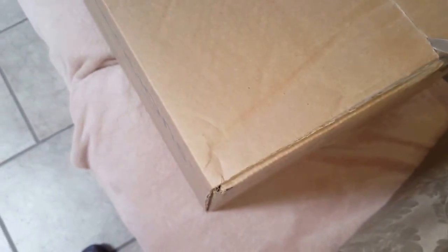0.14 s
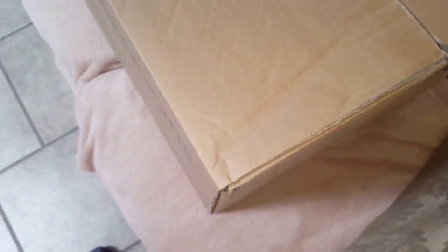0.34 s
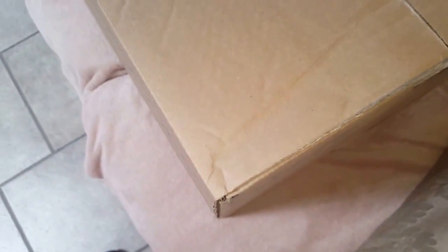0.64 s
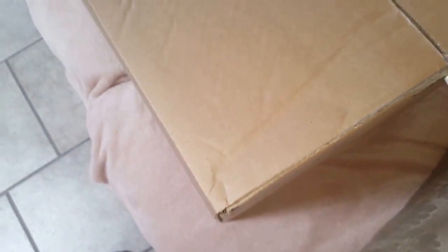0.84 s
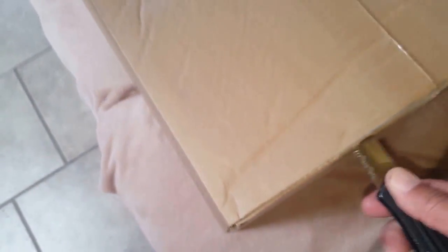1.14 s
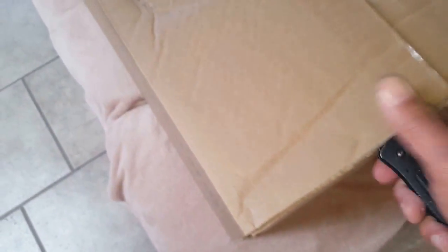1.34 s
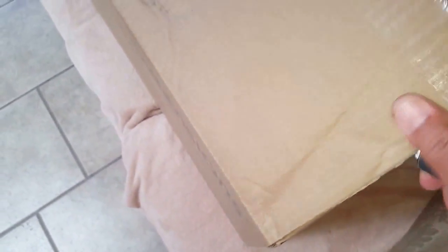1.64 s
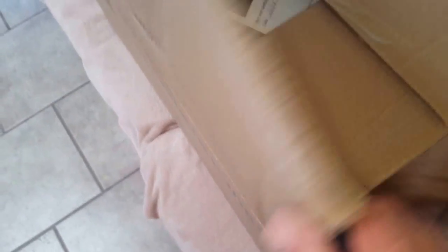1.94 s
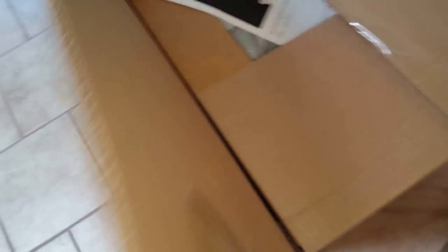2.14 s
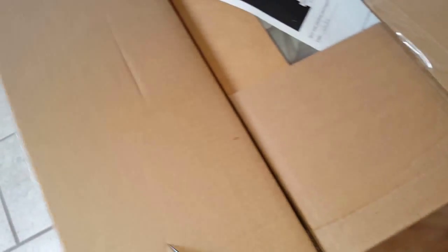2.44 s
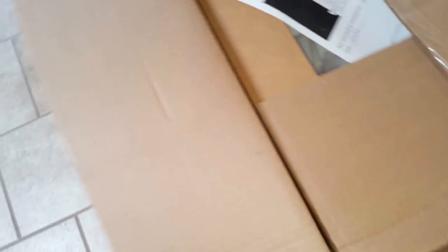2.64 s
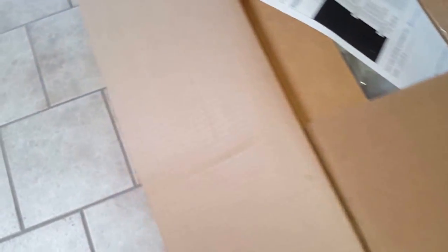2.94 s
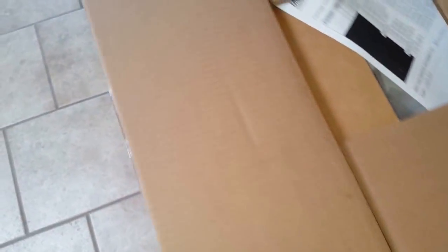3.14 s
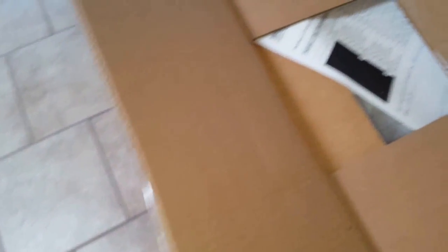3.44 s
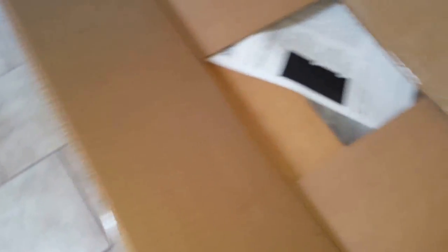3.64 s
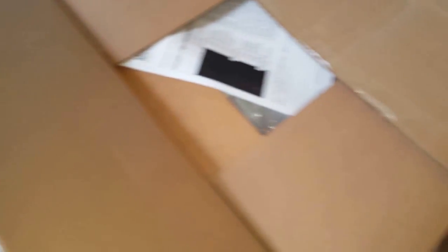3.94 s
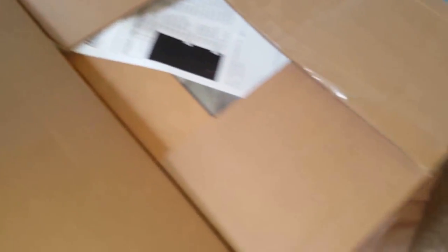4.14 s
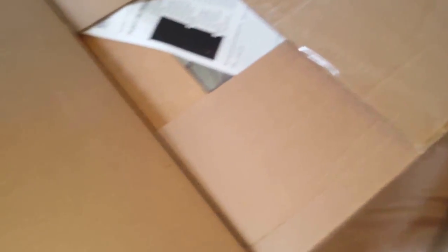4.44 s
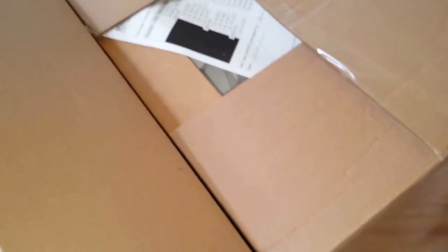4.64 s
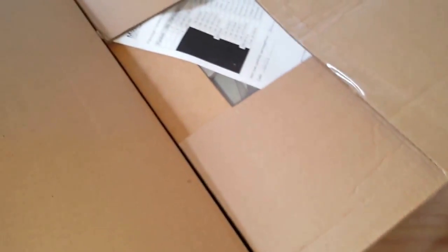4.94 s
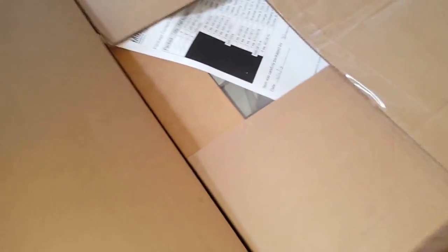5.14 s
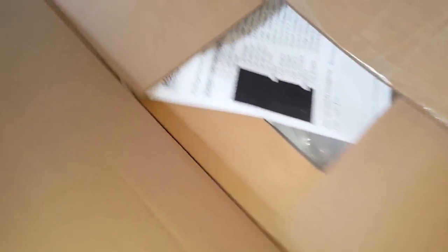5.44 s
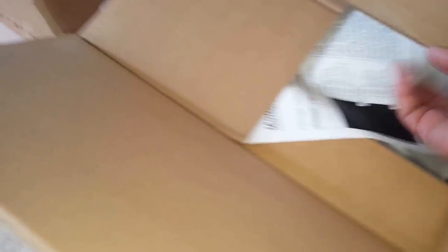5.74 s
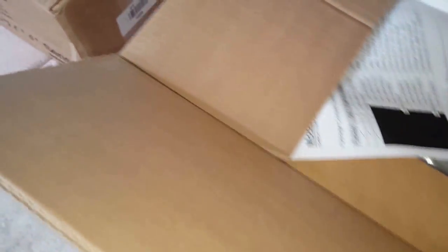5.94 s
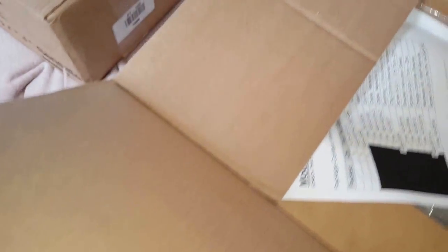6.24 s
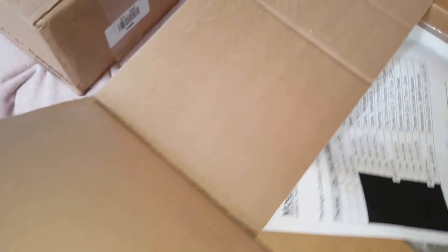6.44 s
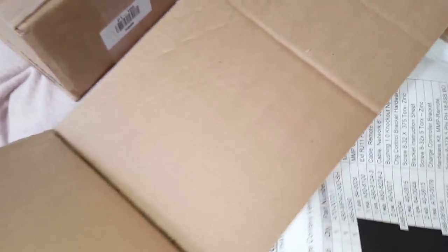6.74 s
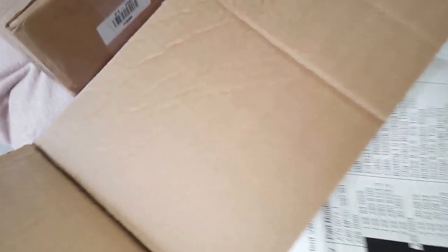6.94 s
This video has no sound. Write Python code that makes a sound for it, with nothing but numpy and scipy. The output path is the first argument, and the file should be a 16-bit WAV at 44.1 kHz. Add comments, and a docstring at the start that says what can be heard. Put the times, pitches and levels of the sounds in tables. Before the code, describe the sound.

Gritty cardboard friction comes in irregular gusts, with crisp fibre ticks and low boxy knocks. The strongest burst is a snapping release early on; afterwards the flaps fold with lighter scuffs and taps. After a quiet gap a blade touches down with a brief ring, then rubbing swells again to the end. Close stereo phone pickup, faint room air and hum, short live indoor echo.

```python
"""Rubbing board hisses and scrapes in gusts of tiny slips as a hand with a knife opens a cardboard box.
The flaps are slit, lifted and folded back close to a phone in a tiled room; the slips shake the hollow box.
Fibres and tape tick as noise bursts; flaps and hand knock the box's decaying modes.
The knife is laid down with a short metal ring. Faint hum, shaped-noise air and a noise-tail echo lie under it."""
import sys
import numpy as np
from scipy import signal
from scipy.fft import rfft, irfft, next_fast_len
from scipy.io import wavfile
from scipy.ndimage import uniform_filter1d, map_coordinates

SR = 44100
rng = np.random.default_rng(int(sys.argv[2]) if len(sys.argv) > 2 else 0)


def generate_wav(signal):
    """Clip the signal to [-1, 1] and save it as 16-bit WAV at the path in sys.argv[1]."""
    frames = np.transpose(np.atleast_2d(signal))
    scaled = np.clip(frames, -1, 1) * 32767
    pcm = np.round(scaled).astype(np.int16)
    wavfile.write(sys.argv[1], SR, pcm)


N = 313110  # samples

# modes of the hollow box: mode_hz, level_db, t60_s
BOX_MODES = [(134.7, 2.5, 0.15), (178, -1.5, 0.095), (230.9, 2, 0.045), (296.3, -7, 0.074),
             (379, -7, 0.046), (441, -13, 0.13), (519.5, -4, 0.071), (625, -6, 0.067), (796, -9.5, 0.046),
             (1080, -5, 0.029)]
# modes of the whole box heaving: mode_hz, level_db, t60_s
HEAVE_MODES = [(70, 0, 0.15), (98.8, -3.5, 0.19)]
# where the hand works: time_s, left_port_delay_ms, left_minus_right_db, hiss_gain_above_10_khz_db
HAND_PATH = [(.25, 0.24, 3.5, -2), (.75, -0.034, 0, 2), (1.25, 0.117, 5, 3), (1.75, 0.0086, 4, 2.5),
             (2.25, -0.153, 7.5, 9.5), (2.75, -0.21, 5.5, 14.5), (3.5, -0.044, 6.5, 4.5),
             (4.75, 0.38, -0.5, -15), (5.25, 0.24, 7, 1), (5.9, 0.07, 5, -1), (6.15, 0.19, 2.5, 9.5),
             (6.9, 0.16, 1.5, 4.5)]
BASS_PAN_DB = -2.5  # left minus right
MID_SIDE = np.array([[1], [-1]])  # sign of the side signal on left, right


def undb(db):
    """Decibels to amplitude."""
    return 10 ** (np.asarray(db) / 20)


def unit(x):
    """Scale x to rms 1."""
    return x / np.sqrt(np.mean(x ** 2))


def colour(x, spectrum):
    """Shape x by a (Hz, dB) spectrum; rms 1."""
    hz, db = np.transpose(spectrum)
    size = next_fast_len(N)
    bin_hz = np.maximum(np.arange(size // 2 + 1) * SR / size, 1)
    gain = undb(np.interp(np.log(bin_hz), np.log(hz), db))
    return unit(irfft(rfft(x, size) * gain, size)[..., :N])


def ring(x, modes):
    """Decaying two-pole modes (Hz, dB, t60 s) struck by x."""
    out = 0
    for hz, db, t60_s in modes:
        radius = np.exp(-np.log(1000) / (t60_s * SR))
        angle = 2 * np.pi * hz / SR
        poles = [1, -2 * radius * np.cos(angle), radius ** 2]
        out = out + undb(db) * signal.lfilter([0, np.sin(angle)], poles, x)
    return out


def split(x, hz):
    """The parts of x under and over hz; they add up flat."""
    low, high = (signal.butter(3, hz, kind, fs=SR, output="sos") for kind in ("low", "high"))
    return signal.sosfilt(low, x), signal.sosfilt(high, x)


def slips(rate_hz, spread_db):
    """Random stick-slip clicks of unequal size."""
    size_db = spread_db * np.minimum(rng.exponential(size=N), 4)
    happens = rng.random(N) < rate_hz / SR
    return happens * rng.standard_normal(N) * undb(size_db)


def flicker(rate_hz, step_db):
    """Wandering gain: random dB steps, smoothed over one step."""
    hold = int(SR / rate_hz)
    steps = np.repeat(rng.standard_normal(N // hold + 1), hold)
    return undb(step_db * uniform_filter1d(steps, hold)[:N])


def sides(pan_db):
    """Left and right gains for a left-minus-right level."""
    return undb(np.array([pan_db, -pan_db]) / 2)


def panel_db(hz, pitch_hz):
    """A panel feeds the box modes near its own pitch most."""
    octaves = np.log2(hz / pitch_hz)
    # modes above the pitch fall off more gently
    return -29 * np.where(octaves > 0, .6, 1) * octaves ** 2


def strokes(step=64):
    """Levels of hiss, scrape and rumble and the shaken panel's pitch, summed over all strokes."""
    # strokes of board on board: full_strength_s, swell_s, hold_s,
    # surface_hiss_db, flute_scrape_db, box_rumble_db, panel_pitch_hz
    stroke_table = [(0.0, 0.044, .12, -41.5, -42, -41, 216), (0.34, 0.1, 0.016, -40.5, -43.5, -37.5, 190),
                    (0.513, 0.14, 0.004, -57, -54.5, -50.5, 262), (.61, 0.054, 0.004, -40, -42.5, -37, 237),
                    (.702, .12, .005, -59, -55, -57, 200), (0.747, .04, .005, -57, -49.5, -48, 175),
                    (0.885, 0.052, .01, -58, -56, -52.5, 230), (1.03, 0.038, 0.0029, -31.5, -36, -27, 216),
                    (1.086, 0.071, 0.0043, -31.5, -35.5, -25, 228),
                    (1.157, 0.14, 0.013, -33.5, -41, -30, 206), (1.314, 0.12, 0.0063, -50, -47.5, -45, 252),
                    (1.469, .2, 0.0061, -47, -48.5, -40.5, 217), (1.545, 0.032, .005, -59, -49, -38, 240),
                    (1.582, 0.022, 0.0043, -64, -46, -40, 255),
                    (1.687, 0.0098, 0.0042, -37.5, -16, -21, 294),
                    (1.723, 0.07, 0.059, -47.5, -57, -28, 181), (1.82, .15, 0.036, -55, -57.5, -44.5, 221),
                    (1.943, 0.11, .01, -59.5, -50.5, -42, 228.6),
                    (2.029, 0.29, 0.096, -53, -56, -56.5, 209), (2.326, 0.29, 0.023, -65, -68, -56, 197),
                    (2.411, 0.067, 0.096, -72.5, -67, -53.5, 274),
                    (2.715, 0.014, 0.0038, -56, -38, -43, 420),
                    (2.751, 0.044, 0.0033, -51, -33.5, -34, 403),
                    (2.835, 0.14, 0.0057, -57.5, -42, -39.5, 417),
                    (2.973, 0.19, .005, -67.5, -56.5, -52, 410),
                    (3.16, 0.078, 0.15, -68.5, -65.5, -56.5, 347),
                    (3.34, 0.038, 0.074, -65.5, -55, -46.5, 383),
                    (3.505, 0.0034, 0.0024, -74, -31.5, -41, 330),
                    (3.522, 0.011, 0.021, -49, -39, -38, 328.4), (3.576, .02, 0.054, -95, -78, -56, 320),
                    (3.984, 0.33, 0.076, -69, -66, -78, 249), (4.748, 0.016, 0.014, -51.5, -48, -38.5, 181),
                    (4.775, .03, 0.066, -66, -51.5, -47.5, 212), (5.008, 0.073, 0.089, -77, -71, -54, 197),
                    (5.172, 0.091, .005, -82, -58.5, -60, 198), (5.53, 0.54, 0.028, -70, -67, -79, 231),
                    (5.796, 0.0072, 0.027, -47, -31, -33.5, 365),
                    (5.849, 0.079, 0.03, -41, -37, -36.5, 220), (5.927, 0.054, 0.018, -56, -44, -36, 151),
                    (6.019, 0.25, 0.033, -69, -54.5, -49.5, 244),
                    (6.146, 0.51, 0.055, -50, -54.5, -56.5, 150),
                    (6.202, 0.0066, 0.017, -60, -47, -26, 157), (6.311, 0.29, 0.034, -51, -53, -42, 195),
                    (6.461, 0.21, .03, -52, -47.5, -57, 296), (6.543, .12, .005, -41, -39.5, -35.5, 290),
                    (6.624, 0.14, .005, -49, -53, -48, 236), (6.738, 0.16, 0.024, -50, -54.5, -47.5, 200),
                    (6.885, 0.11, 0.035, -39, -42, -36.5, 218),
                    (6.93, 0.1, 0.046, -29.5, -36.5, -28.5, 166.8),
                    (7.1, 0.16, .005, -44.5, -36.5, -26.5, 180)]
    swell_db = 30  # gained over the swell time
    # rows below: hiss, scrape, rumble
    # fast stop of a stroke: fall_db_per_s
    stop_db_per_s = [499, 597, 357]
    # flap settling slowly: start_level_db (re stroke)
    settle_db = [-47, -32, -17]
    # flap settling slowly: fall_db_per_s
    settle_db_per_s = [99, 95, 87]
    # a resting hand still stirs the board: level_db
    rest_db = [-82, -87.5, -75.5]

    t = np.arange(0, N + step, step) / SR
    power = undb(rest_db)[:, None] ** 2 * np.ones_like(t)
    weighted_pitch = power[2] * np.mean(np.array(stroke_table)[:, -1])
    for start_s, swell_s, hold_s, *peak_db, pitch_hz in stroke_table:
        after_s = np.maximum(t - start_s - hold_s, 0)
        rise = undb(-swell_db * np.maximum(start_s - t, 0) / swell_s)
        stop = undb(-np.outer(stop_db_per_s, after_s))
        settle = undb(np.array(settle_db)[:, None] - np.outer(settle_db_per_s, after_s))
        stroke = (undb(peak_db)[:, None] * rise) ** 2 * (stop ** 2 + settle ** 2)
        power = power + stroke
        weighted_pitch = weighted_pitch + stroke[2] * pitch_hz
    # the panel shaken hardest sets the pitch
    curves = (*(10 * np.log10(power)), weighted_pitch / power[2])
    return [np.interp(np.arange(N) / SR, t, curve) for curve in curves]


def rubbing():
    """Slips hiss off the liner, scrape over the flutes and shake the hollow box."""
    # hiss spectrum of the liner: freq_hz, density_db_per_hz
    liner = [(1470, -7), (2500, 1), (4050, -7.5), (6250, -4), (8370, -4.5), (8980, -7), (10900, -7),
             (12400, -9), (15000, -13.5), (15900, -31), (16500, -36)]
    # scrape spectrum of the flutes: freq_hz, density_db_per_hz
    flutes = [(240, -27.5), (400, -3.5), (721, 4.5), (1060, -0.5), (1650, 3.5), (1910, -2), (2840, -11.5),
              (3220, -12), (4680, -17), (6000, -32), (7800, -50), (13200, -120)]
    hiss_grain_db, scrape_grain_db, pressure_db = 2.5, 4., 3.5
    heave_db, heave_octave_db = -10, 10  # heave in the rumble at 200 Hz; loss per octave of panel pitch

    t = np.arange(N) / SR
    hiss_db, scrape_db, rumble_db, pitch_hz = strokes()
    hand_s, _, pan_db, top_db = np.transpose(HAND_PATH)
    # the rubbed patch is wide, so part of its sound differs between the ports
    wide = .35 * MID_SIDE
    hiss_slips = slips(7100, hiss_grain_db) + wide * slips(11000, hiss_grain_db)
    grit, sheen = split(colour(hiss_slips, liner), 10000)
    hiss = grit + undb(np.interp(t, hand_s, top_db)) * sheen

    scrape_slips = slips(2500, scrape_grain_db) + wide * slips(2500, scrape_grain_db)
    body, edge = split(colour(scrape_slips, flutes), 1840)
    # a push that bends the board more than it slides sounds duller
    edge_db = np.clip(0.5 * (hiss_db - scrape_db) + 7.0, -12, 3)
    scrape = body + undb(edge_db) * edge

    shake = slips(1100, scrape_grain_db)
    # each mode radiates little below its own pitch
    modes = np.array([unit(split(ring(shake, [mode]), 0.71 * mode[0])[1]) for mode in BOX_MODES])
    weight = np.array([undb(db + panel_db(hz, pitch_hz)) for hz, db, _ in BOX_MODES])
    rumble = np.sum(weight * modes, axis=0) / np.sqrt(np.sum(weight ** 2, axis=0))
    # small high panels move the whole box less
    heave_gain = undb(heave_db - heave_octave_db * np.log2(pitch_hz / 200))
    rumble = rumble + heave_gain * unit(ring(shake, HEAVE_MODES))

    # contact pressure wanders
    face = undb(hiss_db) * hiss * flicker(90, pressure_db)
    face = face + undb(scrape_db) * scrape * flicker(70, pressure_db)
    panned_face = sides(np.interp(t, hand_s, pan_db)) * face
    return panned_face + sides(BASS_PAN_DB)[:, None] * undb(rumble_db) * rumble


def air():
    """Shaped-noise room air, alike on both ports in the bass, and a hum of wavering sines."""
    # room air spectrum: freq_hz, density_db_per_hz
    air_spectrum = [(15, -39), (25, -5), (48, -1), (128, -9.5), (154, -12.5), (422, -19.5), (524, -17.5),
                    (568, -19.5), (746, -23), (979, -24), (3230, -31.5), (9080, -44.5), (12200, -38),
                    (16500, -42.5)]
    # hum tones: tone_hz, rms_db
    hum_tones = [(123.8, -81.5), (468.3, -79.5)]
    air_db = -60.5
    mid, side = (colour(rng.standard_normal(N), air_spectrum) * flicker(3.0, 1.0) for _ in range(2))
    side = signal.sosfilt(signal.butter(1, 900, "high", fs=SR, output="sos"), side)
    t = np.arange(N) / SR
    hum = 0
    for hz, db in hum_tones:
        hum = hum + np.sqrt(2) * undb(db) * flicker(2.4, 1.0) * np.sin(2 * np.pi * hz * t)
    return undb(air_db) * (mid + 1.13 * side * MID_SIDE) + hum


def room(x):
    """Tail of fading noise, shortest in the treble; the bass reaches both ports nearly alike."""
    # reverberation by band: centre_hz, t60_s
    decay_bands = [(150, 0.44), (600, 0.64), (2500, 0.6), (9000, 0.36)]
    t, tail = np.arange(SR) / SR, 0
    for hz, t60_s in decay_bands:
        band = signal.butter(1, [hz / 2, hz * 2], "band", fs=SR, output="sos")
        noise = signal.sosfilt(band, rng.standard_normal((2, SR)))
        mid, side = noise * undb(-60 * t / t60_s) * np.minimum(t / 0.0099, 1)  # 9.9 ms build-up
        pair = mid + min(hz / 2500, 1) * side * MID_SIDE
        tail = tail + pair / np.sqrt(np.sum(mid ** 2) / hz)
    tail = tail / np.sqrt(np.sum(tail ** 2) / 2)
    return signal.fftconvolve(x[None], tail, axes=1)[:, :N]


def ticks(crack_ms=1.82, snap_ms=3.66, rise_ms=0.66):
    """Each release is a bright crack, coloured by the bit that let go, with a duller snap of the board."""
    # fibres and tape letting go, and the knife clicking down at 4.741, 4.749 and 4.998 s: start_s,
    # crack_peak_db, snap_peak_db, left_minus_right_db, crack_ring_hz
    releases = [(0.336, -27.5, -21.5, 2, 6750), (0.428, -38, -53, -6, 2730), (0.465, -41.5, -64, -8, 6300),
                (0.5357, -44, -58, 13, 3100), (0.579, -37, -61, 16, 6440), (0.599, -21.5, -25, 9, 3000),
                (0.616, -16, -26, 4, 2540), (0.6904, -46, -31.5, 3, 2550), (0.7038, -36, -40, 12, 2620),
                (0.7401, -21.5, -42, 4, 2470), (0.805, -41, -37.5, -3, 2900),
                (0.997, -29.5, -44, 14, 11200), (1.3019, -30, -31, 8, 6700),
                (1.3139, -32.5, -43, -17, 3100), (1.3197, -29, -50, 8.5, 3240),
                (1.4409, -40, -31.5, 7, 2760), (1.5303, -28.5, -41.5, 4, 6900),
                (1.5493, -38.5, -40, 17, 7890), (1.567, -39, -63, -19, 6590), (1.59, -25.5, -34, 7.5, 7800),
                (1.683, -11, -14.5, -7, 2500), (1.7047, -16, -37, 4, 7100), (1.7186, -19.5, -23, 7, 7300),
                (1.92, -34.5, -64, 11, 11200), (1.992, -31, -44, 6, 5800), (2.0248, -32, -36.5, 9, 2850),
                (2.0465, -14, -30, 11, 3300), (2.294, -49, -65, 9, 10260), (2.393, -53, -59, 21, 11000),
                (2.75, -35, -28, 13, 2400), (3.201, -44, -55, 6, 13000), (3.211, -39, -49, 10, 12600),
                (3.3273, -47, -54, 20, 12400), (3.3498, -50, -46, 17, 3250), (3.4138, -47, -37.5, 5, 2490),
                (3.5037, -37, -28, 11.5, 2830), (4.741, -54, -26.5, 10.5, 2625),
                (4.749, -39, -30, -14.5, 2470), (4.998, -50, -36, 6.5, 2450), (5.12, -58, -67, 0, 7000),
                (5.1624, -64, -52.5, 12, 2700), (5.7888, -50, -22.5, -2, 2440),
                (5.8125, -47, -22, -5, 2640), (5.8603, -40, -21, -3, 2800), (5.9387, -39.5, -48, 19, 8170),
                (6.0102, -36, -36, 6, 2550), (6.045, -55, -32, -1, 2440), (6.202, -33, -24.5, 0, 12460),
                (6.2112, -39, -53, -14, 7360), (6.403, -64, -41, 18, 2400), (6.5202, -30, -25, 6, 12600),
                (6.6593, -38, -49, -1.5, 11800), (6.7064, -32, -47, -2, 7200), (6.876, -29, -32, -6, 6410)]
    size = 2000
    out, ms = np.zeros((2, N + size)), np.arange(size) / SR * 1000
    bright = signal.butter(2, [3300, 14000], "band", fs=SR, output="sos")
    dull = signal.butter(2, [450, 2300], "band", fs=SR, output="sos")
    for start_s, crack_db, snap_db, pan_db, ring_hz in releases:
        noise = rng.standard_normal((2, size)) * np.minimum(ms / rise_ms, 1)
        burst = noise[0] * np.exp(-ms / crack_ms)
        crack = signal.sosfilt(bright, burst)
        crack = crack + 2.6 * signal.lfilter(*signal.iirpeak(ring_hz, 2.5, fs=SR), burst)
        snap = signal.sosfilt(dull, noise[1] * np.exp(-ms / snap_ms))
        tick = undb(crack_db) * crack / abs(crack).max() + undb(snap_db) * snap / abs(snap).max()
        start = int(start_s * SR)
        out[:, start:start + size] += sides(pan_db)[:, None] * tick
    return out[:, :N]


def knocks(contact_ms=0.66):
    """Half-sine pushes ring the struck panel and heave the whole box."""
    # flaps and hand hitting the box: start_s, blow_peak_db, panel_pitch_hz, heave_peak_db
    blows = [(0.337, -21.5, 190, -39), (0.601, -40, 660, -53), (0.617, -36.5, 230, -59),
             (0.742, -42.5, 122, -65), (1.028, -36, 182, -32), (1.045, -22, 224, -29),
             (1.098, -25, 253, -55), (1.470, -21, 222, -30.5), (1.548, -31, 237, -55),
             (1.685, -14, 283, -39), (1.696, -12, 273, -35), (1.722, -11.5, 226, -20),
             (1.745, -19, 134, -42), (2.715, -34.5, 338, -46), (2.752, -24, 345, -44),
             (3.415, -37.5, 300, -48), (3.503, -18, 345, -40), (3.524, -27.5, 306, -63),
             (4.759, -27, 196, -68), (5.006, -36.5, 182, -60), (5.846, -23.5, 150, -58),
             (5.925, -29.5, 116, -46), (6.203, -17.5, 199, -19.5), (6.404, -34.5, 290, -50),
             (6.472, -34, 272, -68), (6.522, -20, 345, -47), (6.542, -26, 218, -38.5),
             (6.911, -24.5, 242, -56), (7.07, -22, 130, -39), (7.087, -27, 152.3, -27)]
    out, push = np.zeros(N + SR), np.zeros(SR // 2)
    size = int(contact_ms * SR / 1000)
    push[:size] = np.sin(np.pi * np.arange(size) / size)
    low = signal.butter(2, 140, fs=SR, output="sos")
    heave = signal.sosfilt(low, ring(push, HEAVE_MODES))
    heave = heave / abs(heave).max()
    for start_s, blow_db, pitch_hz, heave_db in blows:
        # each blow lands elsewhere and so weights the modes anew
        share_db = 3.7 * rng.standard_normal(len(BOX_MODES))
        modes = [(hz, db + panel_db(hz, pitch_hz) + share, t60_s)
                 for (hz, db, t60_s), share in zip(BOX_MODES, share_db)]
        thud = ring(push, modes)
        # a panel radiates little below its own pitch
        for _ in range(2):
            _, thud = split(thud, .62 * pitch_hz)
        start = int(start_s * SR)
        out[start:start + len(push)] += undb(blow_db) * thud / abs(thud).max() + undb(heave_db) * heave
    return sides(BASS_PAN_DB)[:, None] * out[:N]


def knife():
    """A sharp tap on a hard top rings the blade's modes, which rattle a little in level."""
    # knife laid down: start_s, tap_db
    laid_down = [(4.7513, -23)]
    # modes of the blade: mode_hz, level_db, t60_s
    blade = [(1500, -13, 0.14), (2426, 1, 0.024), (2460, -3, 0.13), (3800, 0, 0.019), (6340, -12, 0.018),
             (7700, -40, 0.036), (11500, -32, .04)]
    taps = np.zeros(N)
    for start_s, db in laid_down:
        taps[int(start_s * SR)] = undb(db)
    rattling = ring(taps, blade) * flicker(120, 2.4)
    return sides(6.4)[:, None] * rattling


def scene():
    """Near sounds with the left port delayed as the hand moves, plus room tail and air."""
    room_db = -13.5
    near = rubbing() + ticks() + knocks() + knife()
    n = np.arange(N)
    hand_s, delay_ms, _, _ = np.transpose(HAND_PATH)
    lag = np.interp(n / SR, hand_s, delay_ms) * SR / 1000  # samples
    ports = np.array([map_coordinates(near[0], [n - lag], order=3), near[1]])
    return ports + undb(room_db) * room(near.mean(axis=0)) + air()


def record(dry):
    """The phone cuts the deepest bass and the top."""
    bass_hz, top_hz = 55, 15900
    dry = signal.sosfilt(signal.butter(3, bass_hz, "high", fs=SR, output="sos"), dry)
    return signal.sosfilt(signal.ellip(8, .2, 70, top_hz, fs=SR, output="sos"), dry)


dry = scene()
out = record(dry)
generate_wav(out)
```